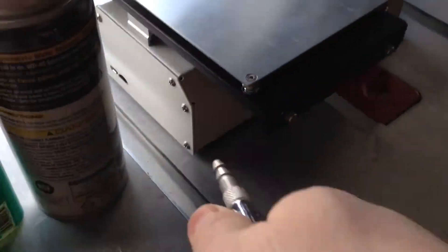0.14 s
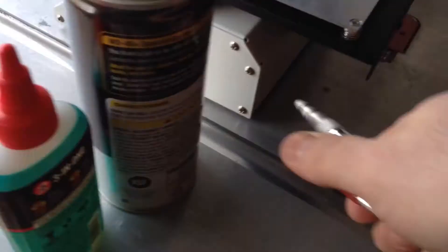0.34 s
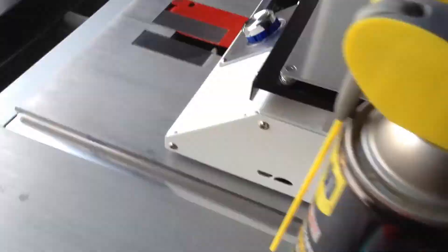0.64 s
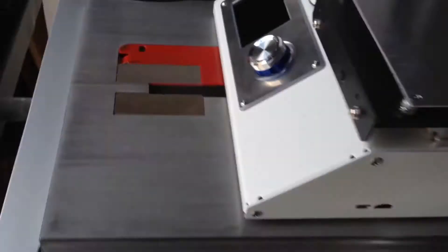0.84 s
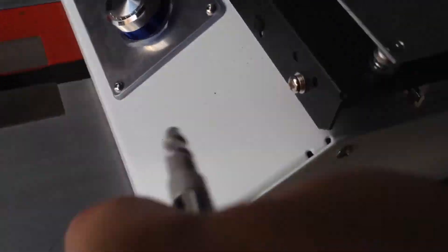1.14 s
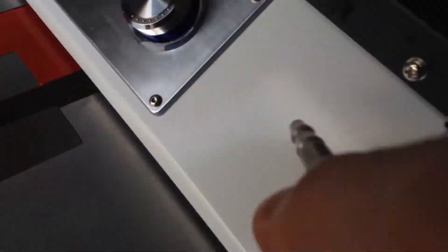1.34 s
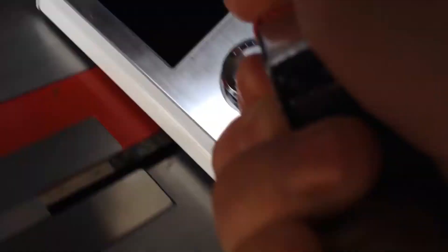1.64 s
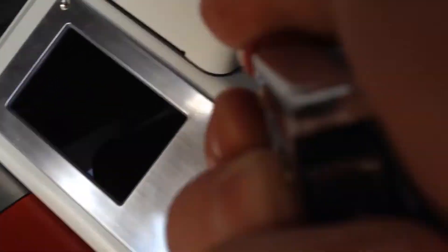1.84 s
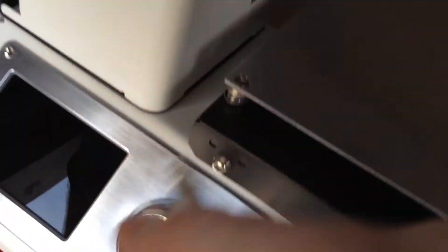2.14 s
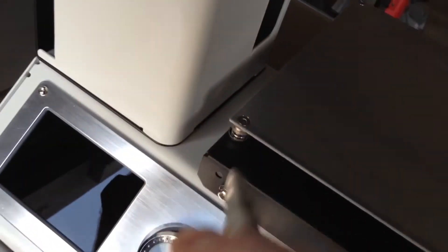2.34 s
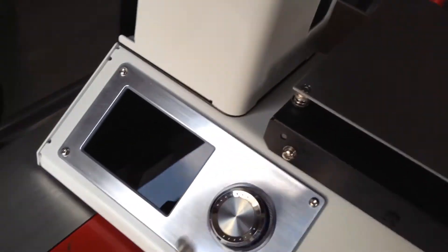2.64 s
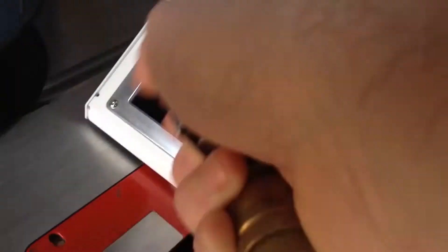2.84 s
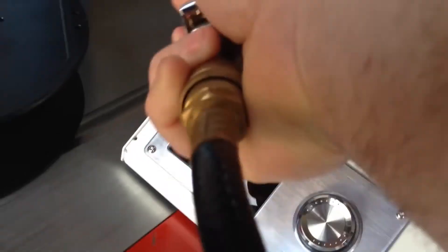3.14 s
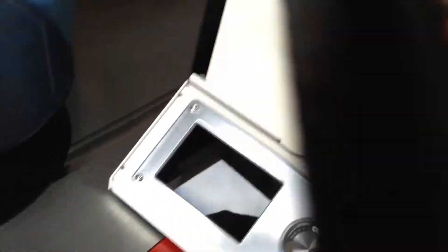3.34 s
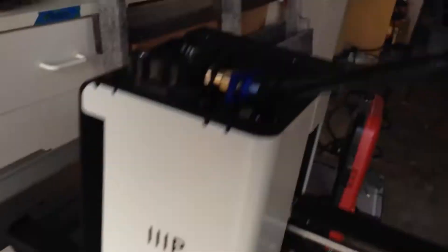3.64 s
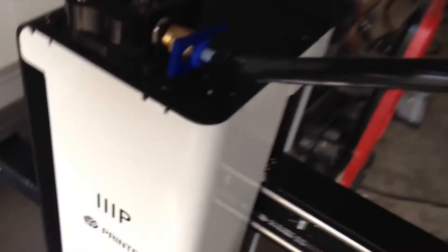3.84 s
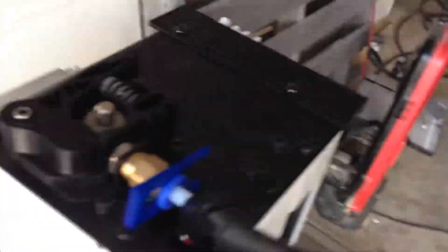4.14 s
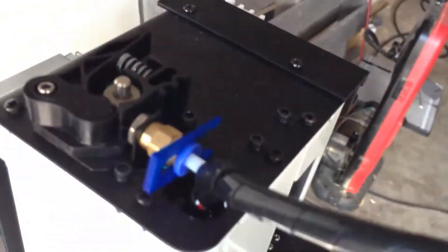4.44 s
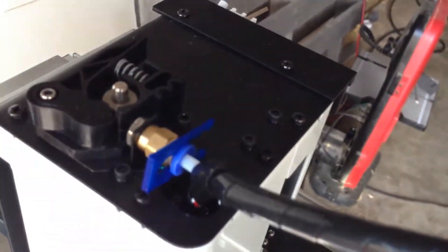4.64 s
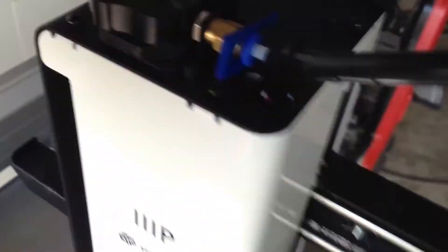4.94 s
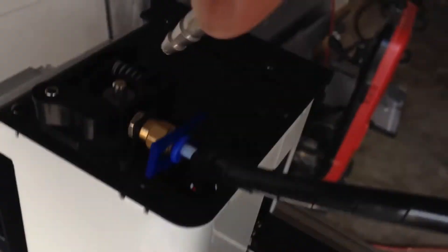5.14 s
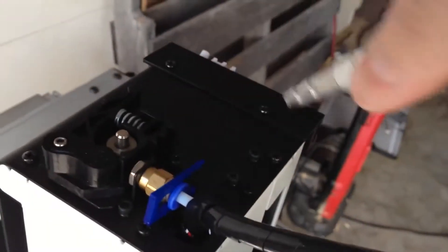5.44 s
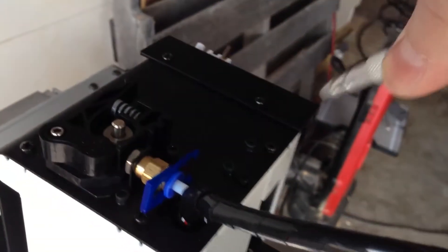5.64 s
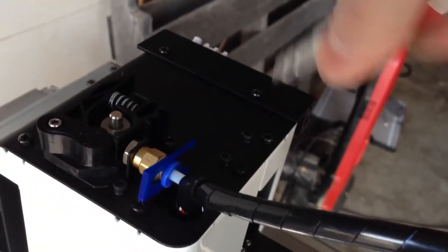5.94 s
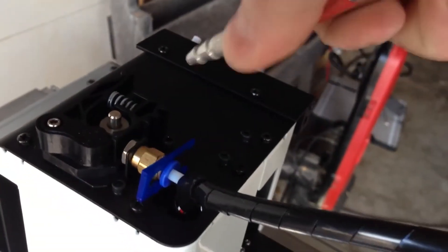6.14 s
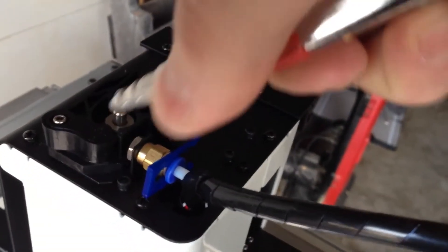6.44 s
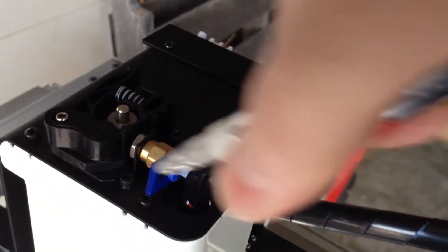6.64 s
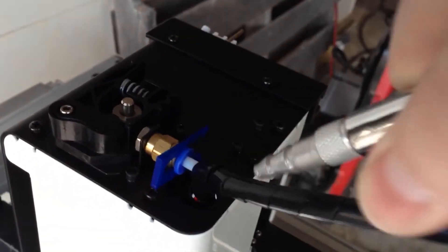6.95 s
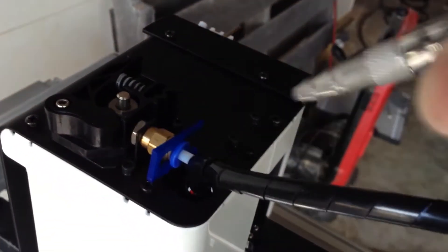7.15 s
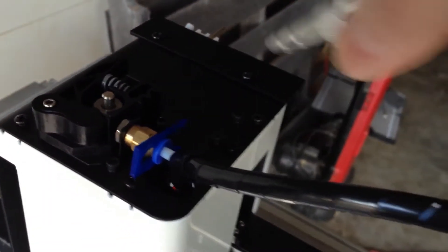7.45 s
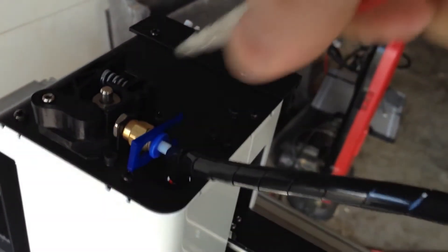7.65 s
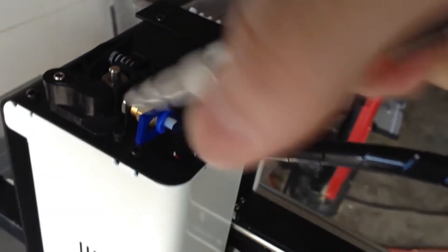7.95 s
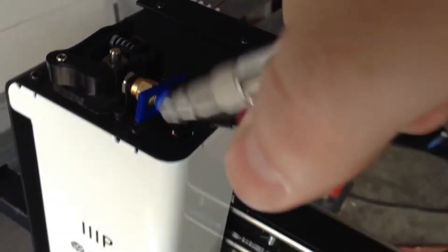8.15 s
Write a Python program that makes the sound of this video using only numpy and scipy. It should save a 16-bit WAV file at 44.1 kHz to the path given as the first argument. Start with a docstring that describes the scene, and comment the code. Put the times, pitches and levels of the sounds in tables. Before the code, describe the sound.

Compressed air hisses from a blow gun in short bursts and long sweeps over a machine, with a compressor humming up late.

```python
"""A compressed-air blow gun dusts off a small machine in a workshop, close to the microphone.
Short bursts of turbulent hiss, then a long sweep over the front panel; edges and hollows recolour the jet.
The valve then leaks a thin hiss and the gun ticks in the hand.
One more burst and a long sweep over the top follow, with dull puffs of air on the microphone at the start.
During that sweep the compressor starts: a stack of low lines over a rumble. The workshop is faint throughout."""
import sys
import numpy as np
from scipy import signal
from scipy.fft import rfft, irfft
from scipy.io import wavfile
from scipy.ndimage import uniform_filter1d

SR = 44100
rng = np.random.default_rng(int(sys.argv[2]) if len(sys.argv) > 2 else 0)


def put_to_file(sound):
    """Save the sound as 16-bit audio at rate SR, in the file named by the first command-line argument."""
    columns = np.atleast_2d(sound).T  # one column per channel
    safe = np.clip(columns, -1, 1)
    whole_steps = np.round(safe * 32767)
    wavfile.write(sys.argv[1], SR, whole_steps.astype(np.int16))


N = 366471
TIME = np.arange(N) / SR
FRAME, HOP = 1024, 256  # samples
FRAME_S = np.arange(N // HOP + 5)[:, None] * HOP / SR
BIN_HZ = np.fft.rfftfreq(FRAME, 1 / SR)
CONTROL_S = np.arange(0, N / SR, .001)


def jet(sputter_db=1.5, eddy_hz=1500, level_db=-1):
    """Turbulent hiss under the trigger; its large, low eddies sputter more than the fine ones."""
    controls = handling()
    air = noise(jet_colour(controls))
    low = signal.sosfiltfilt(signal.butter(2, eddy_hz, fs=SR, output="sos"), air)
    fine = air - low
    sputter = evened(gain_of(sputter_db * wander(90)))
    hiss_db = follow(controls, TIME)[0]
    return (fine + low * sputter) * gain_of(level_db + hiss_db)


# gaps and recesses that ring while the jet is on them: start_s, end_s, pitch_hz, width_hz, lift_db
GAPS = [(.24, .4, 3350, 500, 8), (.24, .4, 5600, 600, 6), (.485, .585, 4100, 230, 10),
        (.48, .58, 2350, 300, 6), (1.23, 1.255, 7600, 700, 7), (1.39, 1.66, 5700, 900, 5),
        (1.39, 1.66, 3400, 600, 6), (1.85, 2.53, 2080, 450, 5.5), (2.27, 2.53, 1680, 300, 7),
        (2.51, 2.62, 10600, 800, 11), (2.51, 2.62, 8100, 500, 9), (2.62, 3.38, 2500, 400, 5),
        (2.6, 3.15, 3950, 300, 5), (3.3, 3.37, 1700, 300, 7), (5.56, 5.98, 3100, 600, 4.5),
        (4.8, 4.85, 1400, 100, 9), (7.01, 7.14, 1130, 160, 7)]
# modes of the hollow housing: pitch_hz, width_hz, lift_share (ratio)
HOUSING_MODES = [(665, 110, 1.1), (1005, 130, 1.1), (2330, 110, .6), (2770, 120, .55)]
# jet crosses the housing's opening: time_s, half_length_s, lift_db
OPENING_PASSES = [(6.735, 0.096, 17.5), (7.14, 0.34, 12), (7.93, 0.057, 19), (8.221, 0.035, 12)]
OPENING_STEEPNESS = 4.0


def jet_colour(controls, ripple_db=1.63, echo_s=0.001116, sway=0.16, patchy_db=2.33):
    """A free jet is bright; against a surface it darkens and roars, and the hollows there ring."""
    _, bright_db, roar_db, rush_db = follow(controls, FRAME_S)
    # spectra: pitch_hz, level_db
    db = read([(30, -31.0), (90, -23.0), (200, -12.0), (400, -2.5), (600, -.5), (900, -1.7),
               (1700, 3.5), (3400, 1.0), (5500, 0.74), (8000, -1.0), (11000, -2.0), (15500, -5.5)])
    # control weights: pitch_hz, db_per_db
    db = db + bright_db * read([(1900, -0.35), (3400, -1.26), (5500, -0.59),
                                (9000, 0.13), (13000, 0.56), (16000, 0.69)])
    db = db + roar_db * read([(700, 0.19), (1050, 0.61), (1500, 1), (2100, 0.76), (3400, 0.0), (5000, 0.0085)])
    db = db + rush_db * read([(700, 0.76), (1400, 0.12)])

    for start_s, end_s, hz, width_hz, lift_db in GAPS:
        aimed = 1. * ((FRAME_S > start_s) & (FRAME_S < end_s))
        db = db + lift_db * bell(hz, width_hz) * uniform_filter1d(aimed, size=5, axis=0)
    housing = sum(share * bell(hz, width_hz) for hz, width_hz, share in HOUSING_MODES)
    db = db + passes(OPENING_PASSES, FRAME_S, OPENING_STEEPNESS)[0] * housing

    # the nearby panel's echo combs the hiss; the comb slides as the hand moves
    delay_s = echo_s * np.exp(sway * np.interp(FRAME_S, TIME, wander(1.5)))
    db = db + ripple_db * np.cos(2 * np.pi * BIN_HZ * delay_s)
    db = db + patchy_db * patches(frames=18, bins=7)

    # hiss above 4 kHz set to 0 dB in each frame
    hiss_power = np.mean(gain_of(db) ** 2 * (BIN_HZ > 4000), axis=1, keepdims=True)
    return db - 10 * np.log10(hiss_power)


# Controls of the jet, before its level trim: hiss_db = level above 4 kHz, bright_db = high in free air,
# roar_db = against a surface, rush_db = low rush of the deflected air.
# short squeezes of the trigger:
# opens_s, closes_s, rise_db_per_s, fall_db_per_s, hiss_db, bright_db, roar_db, rush_db
SHORT_SQUEEZES = [(0, .145, 5002, 1900, -28, 3, -4.5, -16),
                  (0.208, 0.376, 6500, 779, -19.5, 2.5, -6, -15.5),
                  (0.47, 0.506, 5004.5, 1495, -19.5, 2.5, -8, -21),
                  (0.509, 0.564, 5000, 1004, -32, 8.5, -6.5, -8),
                  (.744, 0.78, 1798, 1500, -34.5, 8, -10, -1), (.779, 0.826, 4999, 2289, -29.5, 0, -3, 0),
                  (4.63, 4.817, 3201, 2400, -24.5, 5, -7.5, -2)]
# long squeeze over the front panel: time_s, hiss_db, bright_db, roar_db, rush_db
PANEL_PATH = [(1.2, -20.5, 3, -2.5, -6), (1.284, -23.5, 7.0, -11.5, -5), (1.583, -19.5, 7.0, -12, -16.5),
              (1.852, -22, 5.5, -5.5, -6.5), (1.993, -29.5, 3, 5.5, -5.0), (2.172, -22, 5, -6.5, -7.5),
              (2.479, -24.5, 0.5, 5, -13), (2.621, -28, 3.5, 2.5, 0.5), (2.794, -25, 3.0, 0, -2),
              (3.134, -20.5, 8.5, -14.5, -23), (3.335, -23, 7, 2, -4.5), (3.392, -23.0, 7.5, -18, -24),
              (3.742, -29, 10, -15.5, 0.5)]
# long squeeze over the top of the machine: time_s, hiss_db, bright_db, roar_db, rush_db
TOP_PATH = [(4.903, -23, 5.0, -9.5, -4), (5.039, -26.0, 7, -11, 4), (5.103, -24, 12, -13.5, -18),
            (5.518, -21.5, 12.5, -9, -10), (5.567, -22.0, 0, -11.5, -10), (5.847, -17.5, 6.5, -10, -15),
            (6.036, -24, 3.5, -10, -29), (6.169, -20.0, -2.0, -8, -16.5), (6.444, -23, 0.5, -4.5, -8),
            (6.697, -28.0, 1.5, -8, -3), (6.96, -19.5, 2.5, -14, -1.5), (7.188, -17, 4, -13, -21),
            (7.437, -17.5, -1.5, -9.5, -19.5), (7.479, -26.5, 1, -4.5, -5.5), (7.71, -22.5, 1, -6.0, -9),
            (7.947, -27.5, 4.5, -11.5, -24), (8.243, -22.5, 5, -14.5, 3.5)]
PANEL_RISE_DB_PER_S, PANEL_FALL_DB_PER_S = 9000, 1700
TOP_RISE_DB_PER_S, TOP_FALL_DB_PER_S = 3000, 760
# more flutter over the knobs and screws of the panel than over the top
BURST_FLUTTER_DB, PANEL_FLUTTER_DB, TOP_FLUTTER_DB, FLUTTER_HZ = 0.84, 1.45, 0.5, 42
# jet catches an edge and the hiss flares: time_s, half_length_s, lift_db, bright_change_db
EDGE_FLARES = [(.063, 0.013, 13, 8), (.133, .012, 3.5, -3.5), (.562, 0.01, 15, -4.5),
               (.783, 0.01, 10.5, -1.5), (1.24, .0064, 4, -1), (1.274, .0044, 5, -6),
               (1.341, 0.0064, 1, -7), (1.633, 0.0055, 5.5, -1.5), (2.08, 0.078, 4, -0.5),
               (2.287, .01, 2, -2), (2.348, 0.0047, 6.5, -2.5), (2.412, 0.0076, 1, -6),
               (2.605, 0.009, 6.5, -6), (2.72, 0.0091, 4, -3), (2.789, .014, 3.5, -2.5),
               (2.861, 0.021, 5, -2), (2.931, 0.018, 6.5, -0.5), (3.022, 0.011, 8, 3.5),
               (3.104, 0.017, 5.5, -1), (3.158, 0.0068, 1.5, 0.5), (3.28, 0.011, 4, 0.5),
               (3.322, 0.0091, 8.5, 4), (3.477, 0.023, 7, 1), (3.588, .025, 6.5, 2.5),
               (4.695, 0.027, 5, -0.5), (5.075, 0.0099, 5, -5.5), (5.917, 0.051, 2, -8.5),
               (6.279, 0.042, 6, 5.5), (6.458, 0.023, 6, 1.5), (6.779, 0.036, 8, 0), (6.917, 0.032, 6.5, 2),
               (7.018, 0.021, 2.5, -3.5), (7.103, 0.025, -1, -6), (7.791, 0.098, 7.5, -5)]
FLARE_ROAR_LAG, FLARE_RUSH_LAG = 0.34, .9  # share of a flare that roar and rush do not follow
# jet slips off the surface: time_s, half_length_s, body_loss_db (roar and rush against hiss), hiss_change_db
SURFACE_SLIPS = [(.305, .007, -3, -4), (1.69, 0.06, 9.5, -3), (2.564, 0.041, 15.5, 9),
                 (2.988, 0.025, -6, -10), (3.203, 0.039, 1, -7), (5.297, 0.051, 8, -1),
                 (5.54, .018, -0.5, -9), (6.503, 0.048, 17.5, 7.5), (6.58, 0.015, 10, 6),
                 (7.8, 0.049, 9, 1.5)]
SLIP_BRIGHTENING = 0.38  # dB of brightness per dB of body lost
FLARE_STEEPNESS, SLIP_STEEPNESS = 3.0, 6.0  # 2 = rounded swell, more = flatter top, steeper sides


def handling():
    """The hand squeezes and aims the gun; rows of time_s, hiss_db, bright_db, roar_db, rush_db."""
    t = CONTROL_S
    flutter = np.interp(t, TIME, wander(FLUTTER_HZ))
    squeezes = []
    for opens_s, closes_s, rise, fall, *held in SHORT_SQUEEZES:
        path = [(opens_s, *held), (closes_s, *held)]
        squeezes.append(squeeze(path, rise, fall, BURST_FLUTTER_DB * flutter))
    squeezes.append(squeeze(PANEL_PATH, PANEL_RISE_DB_PER_S, PANEL_FALL_DB_PER_S, PANEL_FLUTTER_DB * flutter))
    squeezes.append(squeeze(TOP_PATH, TOP_RISE_DB_PER_S, TOP_FALL_DB_PER_S, TOP_FLUTTER_DB * flutter))

    squeezes = np.array(squeezes)
    strongest = squeezes[:, 0].argmax(axis=0)
    hiss, bright, roar, rush = squeezes[strongest, :, np.arange(len(t))].T
    flare, flare_bright = passes(EDGE_FLARES, t, FLARE_STEEPNESS)
    loss, slip_hiss = passes(SURFACE_SLIPS, t, SLIP_STEEPNESS)
    hiss = hiss + flare + slip_hiss
    bright = bright + flare_bright + SLIP_BRIGHTENING * loss
    roar = roar - FLARE_ROAR_LAG * flare - loss
    rush = rush - FLARE_RUSH_LAG * flare - loss
    return np.transpose([t, hiss, bright, roar, rush])


def squeeze(rows, rise_db_per_s, fall_db_per_s, flutter_db):
    """The jet's four controls for one squeeze, open from its first row to its last."""
    hiss, *colour = follow(rows, CONTROL_S)
    opening_db = valve(CONTROL_S, rows[0][0], rows[-1][0], rise_db_per_s, fall_db_per_s)
    return [hiss + opening_db + flutter_db, *colour]


def valve(t, opens_s, closes_s, rise_db_per_s, fall_db_per_s):
    """Level in dB of a valve that snaps open, holds and shuts."""
    before_db = rise_db_per_s * np.maximum(opens_s - t, 0)
    after_db = fall_db_per_s * np.maximum(t - closes_s, 0)
    return np.maximum(-before_db - after_db, -120)


def passes(rows, t, steepness):
    """Each row swells and fades around its moment; one sum for each column of heights."""
    total = 0
    for s, half_s, *heights in rows:
        swell = np.exp(-abs((t - s) / half_s) ** steepness)
        total = total + np.multiply.outer(heights, swell)
    return total


# eddies that hit the microphone: time_s, crest_rms_db, half_length_s, upper_edge_hz
EDDIES = [(0.204, -43, .003, 500), (0.827, -41.5, 0.014, 700), (0.86, -40.5, 0.0032, 470),
          (0.977, -55, .004, 450), (1.201, -42, .004, 600), (2.507, -33, 0.0055, 900),
          (2.663, -44, 0.014, 456), (2.805, -41.5, 0.038, 453), (3.717, -19, 0.003, 1780),
          (3.727, -30.5, 0.011, 1390), (4.782, -25, 0.0027, 1200), (4.806, -34, 0.0094, 796),
          (4.826, -30.5, 0.0028, 1200), (4.938, -26, 0.0022, 1500), (4.955, -22, 0.0017, 1070),
          (5.005, -17.5, 0.0066, 1160), (5.028, -18, 0.0035, 1820), (5.028, -27.5, 0.042, 1320),
          (5.046, -26, 0.0037, 1410), (5.071, -28, .003, 1200), (5.111, -40, 0.0049, 694),
          (5.172, -37, 0.0032, 1220), (5.194, -38.5, .003, 1400), (5.216, -41, 0.0041, 1000),
          (5.318, -40, 0.0013, 1200), (5.377, -45, 0.017, 900), (5.434, -48, 0.0055, 1000)]


def buffets(low_hz=150):
    """Deflected air hits the microphone in short dull puffs."""
    out = np.zeros(N)
    for s, db, half_s, edge_hz in EDDIES:
        t = np.arange(-3 * half_s, 3 * half_s + .02, 1 / SR)
        swell = np.exp(-(t / half_s) ** 2)
        puff = band(swell * rng.standard_normal(SR)[:len(t)], low_hz, 2 * edge_hz, order=4)
        puff = signal.sosfilt(signal.butter(4, edge_hz, fs=SR, output="sos"), puff)
        add(out, s + t[0], gain_of(db) * puff * np.linalg.norm(swell) / np.linalg.norm(puff))
    return out


# sheet metal ringing on as a burst stops: time_s, peak_db, pitch_hz, t60_s
SHEET_RINGS = [(.565, -52, 1000, .26)]


def rings():
    """A thin note of sheet metal dies away."""
    out, t = np.zeros(N), np.arange(SR // 2) / SR
    for s, db, hz, t60_s in SHEET_RINGS:
        add(out, s, gain_of(db - 60 * t / t60_s) * np.sin(2 * np.pi * hz * t))
    return out


# gun and hose ticking in the hand: time_s, peak_db, pitch_hz, decay_s
HAND_TICKS = [(.947, -45.5, 1690, 0.00092), (1.012, -51.5, 3500, 0.0061), (1.134, -57.5, 2000, .001),
              (1.159, -56.5, 2000, .001), (1.185, -52, 2000, 0.00074), (3.817, -47, 10000, 0.00079),
              (3.893, -51, 1600, 0.00089), (3.902, -50, 1590, .001), (3.916, -52.5, 1900, 0.00078),
              (4.051, -52.5, 2190, .005), (4.215, -38.5, 8150, 0.00078), (4.262, -59, 3000, .001),
              (4.389, -61, 1790, 0.0017), (4.879, -46, 2490, 0.0091)]


def ticks():
    """Tiny dry clicks: decaying noise, each banded around its own pitch."""
    out, t = np.zeros(N), np.arange(SR // 20) / SR
    for s, db, hz, decay_s in HAND_TICKS:
        tick = band(rng.standard_normal(len(t)) * np.exp(-t / decay_s), hz * 0.55, hz * 1.3)
        add(out, s, gain_of(db) * tick / abs(tick).max())
    return out


# air seeping through the closed valve: start_s, end_s, level_db
VALVE_SEEPS = [(.705, .74, -58), (.87, .94, -75), (.953, .962, -59), (.97, 1.2, -70.5),
               (3.857, 3.87, -62.5), (3.88, 4.3, -74), (4.083, 4.13, -60), (4.3, 4.62, -72),
               (4.88, 4.9, -56.5)]
# its relative spectrum: pitch_hz, level_db
SEEP_SPECTRUM = [(1000, -20), (5000, -17), (6300, -1.5), (8000, -7.5), (9700, 1.5), (12000, -4.5),
                 (13600, -1.5), (16000, -4.5)]
SEEP_RISE_DB_PER_S, SEEP_FALL_DB_PER_S = 900, 700


def leak():
    """A thin hiss of coloured noise from the closed valve; the strongest seep sets the level."""
    levels_db = [level_db + valve(TIME, start_s, end_s, SEEP_RISE_DB_PER_S, SEEP_FALL_DB_PER_S)
                 for start_s, end_s, level_db in VALVE_SEEPS]
    return gain_of(np.max(levels_db, axis=0)) * evened(noise(read(SEEP_SPECTRUM)))


def room(x, t60_s=0.125):
    """The short, dull tail of a cluttered workshop: decaying noise as impulse response."""
    t = np.arange(SR // 2) / SR
    tail = band(rng.standard_normal(len(t)), 150, 6000, order=1)
    tail = tail * gain_of(-60 * t / t60_s) * (t > .006)
    return signal.fftconvolve(x, tail / np.linalg.norm(tail))[:N]


# compressor run: time_s, shaft_hz (turns per s), hum_level_db
SHAFT = [(5.5, 42.1, -81), (5.57, 43.07, -47.5), (5.7, 43.67, -42.5), (6.44, 44.03, -43), (6.52, 43.5, -63),
         (6.68, 43.8, -46.5), (7.6, 44.06, -44), (8.1, 44.46, -41), (8.31, 43.6, -36.5)]
# hum lines, relative: shaft_multiple (ratio), level_db
HUM_ORDERS = [(1, -6.5), (2, 3.5), (3, -1), (4, 0.5), (5, 1), (6, -8), (7, 2), (8, 1.5), (9, -23),
              (10, -23.5)]
# rumble spectrum, relative: pitch_hz, density_db (dB per Hz)
RUMBLE_SPECTRUM = [(20, -9.5), (60, -8), (130, -3.5), (350, -13), (700, -5.5), (1500, -13), (4000, -18),
                   (12000, -27.5)]


def compressor(waver_db=3.0, rumble_db=-4, jitter=.003):
    """One stroke a turn gives a stack of wavering low lines over a rumble."""
    shaft_hz, db = follow(SHAFT, TIME)
    turns = np.cumsum(shaft_hz * (1 + jitter * wander(6))) / SR
    hum = np.zeros(N)
    for order, line_db in HUM_ORDERS:
        line = np.cos(2 * np.pi * (round(order) * turns + rng.random()))
        hum += gain_of(line_db + waver_db * wander(27.0)) * line
    rumble = evened(noise(read(RUMBLE_SPECTRUM)))
    return gain_of(db) * (evened(hum) + gain_of(rumble_db) * rumble)


# quiet workshop, relative spectrum: pitch_hz, density_db (dB per Hz)
SHOP_SPECTRUM = [(30, -44.5), (80, -25), (130, -5.5), (250, -5.5), (420, -2.5), (700, -12), (2000, -23.5),
                 (6000, -26), (15000, -28)]
SHOP_DB = -70  # rms


def workshop(uneven_db=2.0, patchy_db=3):
    """A faint, uneven noise background, strongest in the low middle."""
    db = read(SHOP_SPECTRUM) + patchy_db * patches(frames=8, bins=4) * (BIN_HZ < 900)
    return gain_of(SHOP_DB) * evened(noise(db) * gain_of(uneven_db * wander(30)))


def gain_of(db):
    """Decibels to amplitude."""
    return 10 ** (np.asarray(db) / 20)


def evened(x):
    """Scales to rms 1."""
    return x / np.sqrt(np.mean(x ** 2) + 1e-20)


def follow(rows, t):
    """Every column of a curve at the times t."""
    s, *columns = np.transpose(rows)
    return [np.interp(t, s, column) for column in columns]


def read(points):
    """A spectrum at every bin, joined on a log-frequency axis."""
    hz, value = np.transpose(points)
    return np.interp(np.log(BIN_HZ + 1), np.log(hz), value)


def bell(hz, width_hz):
    """Shape of one resonance, height 1."""
    return 1 / (1 + (2 * (BIN_HZ - hz) / width_hz) ** 2)


def patches(frames, bins):
    """Random patches of rms 1 over time and frequency, smoothed over so many frames and bins."""
    field = rng.standard_normal((len(FRAME_S), len(BIN_HZ)))
    field = uniform_filter1d(field, size=frames, axis=0)
    return evened(uniform_filter1d(field, size=bins, axis=1))


def wander(rate_hz):
    """Smooth chance of rms 1: white noise faded out above rate_hz."""
    lowpass = 1 / (1 + (np.fft.rfftfreq(N, 1 / SR) / rate_hz) ** 4)
    return evened(irfft(rfft(rng.standard_normal(N)) * lowpass, N))


def noise(db):
    """White noise of rms 1 coloured by a dB field over frames and bins."""
    white = rng.standard_normal(N + 2 * FRAME)
    z = signal.stft(white, nperseg=FRAME, noverlap=FRAME - HOP)[2][:, :len(FRAME_S)]
    return signal.istft(z * gain_of(db + 0 * FRAME_S).T, nperseg=FRAME, noverlap=FRAME - HOP)[1][:N]


def band(x, low_hz, high_hz, order=2):
    """Band-pass filter."""
    edges_hz = [low_hz, min(high_hz, SR / 2 - 1)]
    return signal.sosfilt(signal.butter(order, edges_hz, "band", fs=SR, output="sos"), x)


def add(mix, s, sound):
    """Mixes a sound in at time s."""
    part = mix[round(s * SR):][:len(sound)]
    part += sound[:len(part)]


def scene(room_db=-22):
    """All sources at one microphone, alike in both channels."""
    near = jet() + rings() + ticks() + leak()
    mono = near + gain_of(room_db) * room(near) + buffets() + compressor() + workshop()
    return np.array([mono, mono])


def record(dry, edge_hz=15900):
    """Band limit: a steep low-pass; no treble above edge_hz."""
    lowpass = signal.firwin(511, edge_hz, window=("kaiser", 9), fs=SR)
    return signal.oaconvolve(dry, lowpass[None], "same")


dry = scene()
out = record(dry)
put_to_file(out)
```